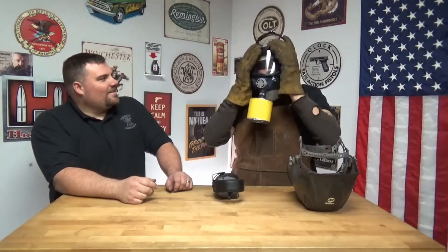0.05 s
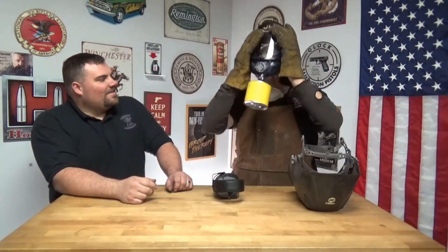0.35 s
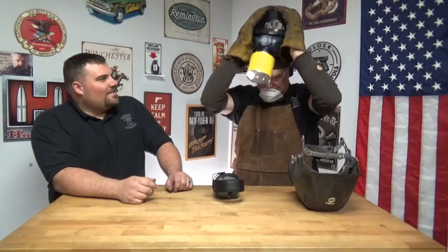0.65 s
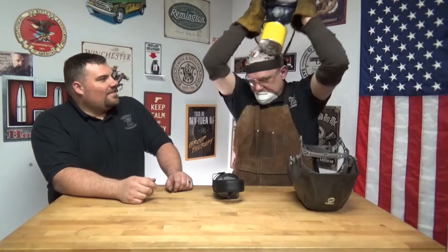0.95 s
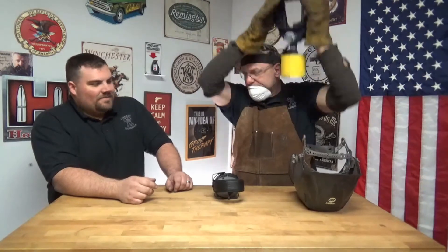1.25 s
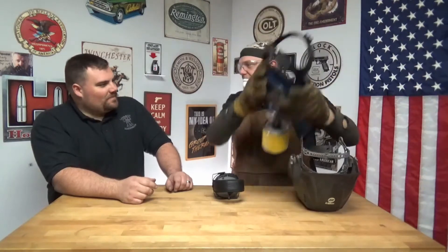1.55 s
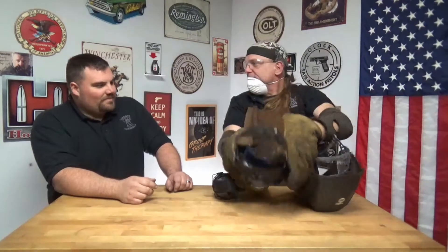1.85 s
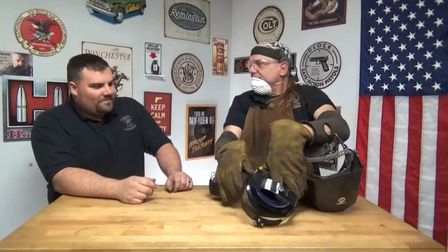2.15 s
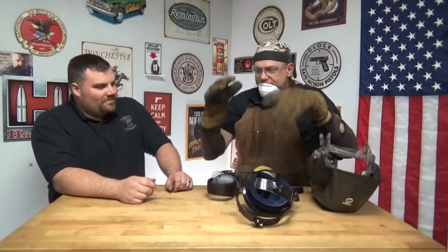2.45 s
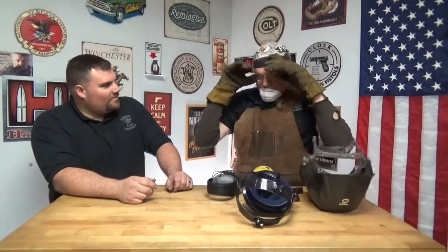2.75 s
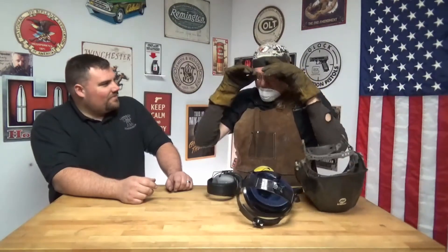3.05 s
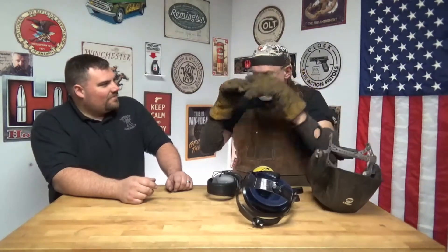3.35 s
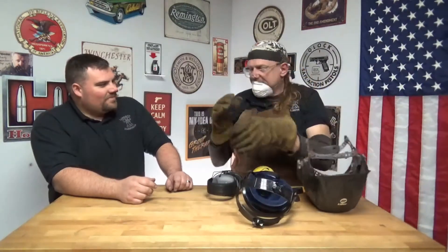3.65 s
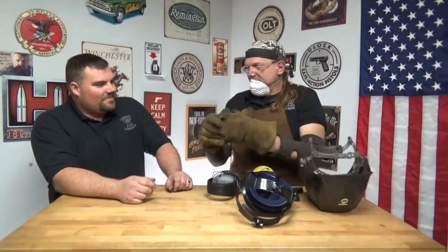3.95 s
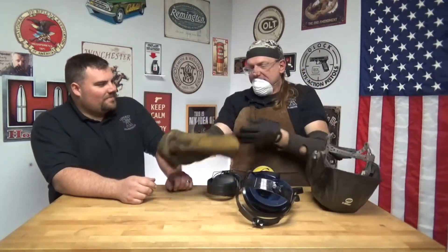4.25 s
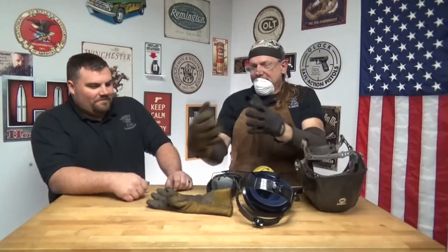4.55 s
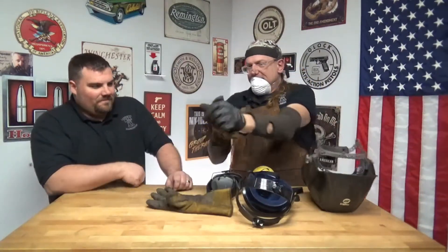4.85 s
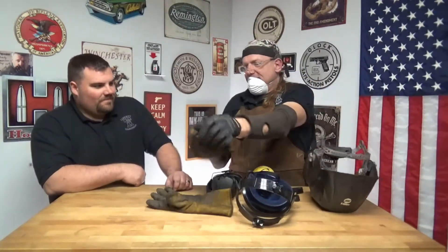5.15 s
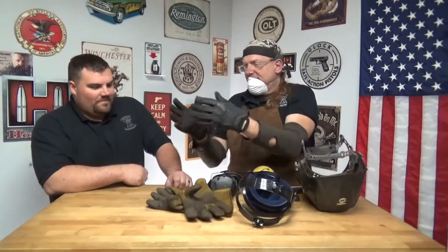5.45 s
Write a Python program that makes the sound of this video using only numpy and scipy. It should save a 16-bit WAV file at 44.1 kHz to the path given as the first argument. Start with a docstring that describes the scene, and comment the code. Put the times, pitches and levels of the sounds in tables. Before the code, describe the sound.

A mask knocks and rocks on a wooden workbench amid soft clothing rustle, followed by two leather gloves tugged off and tossed down.

```python
"""Sleeves and leather gloves rustle as a man pulls off a gas mask in a small workshop.
He drops it on a wooden bench: the top rings, the rubber judders, the mask rocks, its visor clacks
and its buckles click. He tugs off two welding gloves and tosses each on the bench with a slap.
Impacts are bench modes plus bursts of micro-impacts; rustle is stick-slip noise.
Mains and a motor hum quietly over moving air, and something ticks faintly thirty times a second."""
import sys
import numpy as np
from scipy import signal
from scipy.fft import rfft, irfft, next_fast_len
from scipy.io import wavfile
from scipy.ndimage import uniform_filter1d

SR = 44100
rng = np.random.default_rng(int(sys.argv[2]) if len(sys.argv) > 2 else 0)


def file_out(sig):
    """Save sig as 16-bit WAV at sys.argv[1]."""
    # one column per channel
    cols = np.atleast_2d(sig).T
    # limit, then scale
    lim = np.clip(cols, -1, 1)
    pcm = np.round(lim * 32767).astype(np.int16)
    wavfile.write(sys.argv[1], SR, pcm)


N = 251261
N_FFT = next_fast_len(N)
T = np.arange(N) / SR

# mask drops, then rocks twice: start_s, knock_db, boom_db, clack_db, clack_hz, crack_db
MASK_LANDINGS = [(1.8235, -11, -9, -17.5, 980, -26), (1.9692, -15, -24, -21, 610, -29),
                 (2.07, -17, -26, -17.5, 635, -35)]
# hard visor tips onto the wood: start_s, clack_db, clack_hz, crack_db, clack_t60_s
VISOR_CLACKS = [(1.8799, -16.5, 1650, -26.5, 0.061), (2.0938, -21.5, 1600, -28, 0.032),
                (2.1245, -21, 2480, -27.5, 0.074)]
# bench top with the mask on it: mode_hz, relative_db, base_t60_s
BENCH_MODES = [(68, -13.5, 0.4), (147.3, -4.5, 0.16), (171.6, 4.5, 0.13), (225.5, -10, 0.39),
               (290.7, -17, 0.37), (358, -9.5, 0.085), (373.4, -1, 0.055), (424, -4, 0.067),
               (491, -3, 0.12), (563.4, 4, 0.068), (580, -1.5, 0.12), (594.4, -13.5, 0.15),
               (646, -0.5, 0.022), (800, -26, 0.093), (866, 1, 0.023), (939, -7, 0.052), (1070, -18, 0.079),
               (1125, -16, 0.22), (1220, -16.5, 0.069), (1510, -48, 0.27), (1790, -24, 0.053)]
# loose buckle taps the mask: start_s, level_db
BUCKLE_TAPS = [(1.3204, -40), (2.1258, -29), (2.138, -22), (2.163, -28), (2.2308, -25), (2.2745, -34)]
# buckle ring: mode_hz, relative_db, base_t60_s
BUCKLE_MODES = [(2196, 2.5, 0.029), (2270, 2, 0.016), (2920, -6, 0.036), (3220, -3.5, 0.052),
                (3506, 1, .025), (3530, -10, 0.017), (3780, 4, 0.014)]
# gloves land on the bench: start_s, slap_db, slap_hz, slap_t60_s, palm_db, fingers_db
GLOVE_DROPS = [(4.512, -27.5, 1150, 0.061, -25, -33.5), (5.472, -33.5, 1620, 0.02, -30.5, -59)]
# hard parts of straps and cuffs: start_s, level_db, centre_hz
STRAP_CLICKS = [(1.045, -51.5, 6000), (1.757, -49, 2930), (2.2747, -66, 3000), (2.3376, -45.5, 6040),
                (2.7788, -46, 5560), (2.9542, -52.5, 7000), (3.2448, -50.5, 8600), (4.4828, -37.5, 5200),
                (5.377, -51.5, 5600), (5.473, -35, 3800), (5.6095, -45, 4400)]
# padded gear bumps together: start_s, tap_db, thump_db
GEAR_BUMPS = [(1.045, -62, -46), (1.19, -52, -43.5), (1.276, -52.5, -50), (2.336, -50, -42.5),
              (2.466, -47.5, -43.5), (2.736, -55, -64), (3.994, -50, -39.5), (5.379, -50.5, -44),
              (5.6109, -42, -44.5)]
# arm movements: peak_s, half_length_s, hiss_db
SLEEVE_SWISHES = [(0.376, 0.28, -61), (.505, 0.09, -53.5), (0.809, 0.12, -56.5), (1.155, 0.1, -53),
                  (3.374, 0.018, -50), (4.83, 0.047, -53), (5.676, 0.14, -62.5)]
# gloves grip the mask, then are tugged off: peak_s, half_length_s, rub_db
GLOVE_RUBS = [(0.216, 0.73, -59.5), (1.345, 0.089, -55), (1.61, .024, -41.5), (1.706, 0.18, -53),
              (2.834, 0.18, -61.5), (3.289, 0.059, -58), (4.066, 0.05, -59.5), (4.277, 0.05, -46.5),
              (4.954, 0.093, -55.5), (5.131, 0.067, -47.5), (5.303, 0.068, -59)]
# mask and cuffs drag over wood: peak_s, half_length_s, hiss_db, rub_db
DRAGS = [(1.88, 0.057, -34, -38), (2.039, .07, -37, -37.5), (2.122, 0.05, -34, -33.5),
         (2.239, .1, -50, -41.5), (4.49, 0.0085, -54, -39), (4.518, 0.042, -47.5, -43),
         (5.451, .017, -59, -40)]
# cloth hiss: freq_hz, density_db
CLOTH_SPECTRUM = [(1500, -3), (2600, 1), (4200, 2.5), (6500, -3), (9000, -8), (11000, -9.5)]
# leather rub: freq_hz, density_db
LEATHER_SPECTRUM = [(150, 0), (350, 1.5), (600, 6), (1100, 1.5), (1800, 1.5), (2800, -2), (5000, -20)]
# thin sheen of sliding sleeves: freq_hz, density_db
SHEEN_SPECTRUM = [(4000, -33), (7000, -25), (8500, 3), (11000, -4)]
# room decay: freq_hz, t60_s
ROOM_DECAY = [(60, 0.61), (200, 0.32), (600, 0.27), (2000, 0.23), (5000, 0.15), (10000, 0.22)]
# reflections against direct sound: freq_hz, wet_db
ROOM_WET = [(60, -15), (200, -2.5), (600, -3.5), (2000, -4.5), (5000, -5), (10000, -4)]
# left-right likeness of reflections: freq_hz, correlation
ROOM_CORRELATION = [(60, 0.18), (150, 0.8), (300, 0.98), (600, 0.12), (2000, 0.24), (10000, .05)]
# mains and motor lines: pitch_hz, relative_db
HUM_LINES = [(120.0, -53), (111.3, -58), (167.0, -65), (222.6, -69), (333.9, -67.5)]
# moving air: freq_hz, density_db
AIR_SPECTRUM = [(25, -54), (45, -6), (70, -3), (110, 2), (200, 0), (300, -2.5), (400, 4), (550, -5.5),
                (1000, -9.5), (2000, -13), (3000, -14.5), (5000, -18.5), (10500, -23)]
# left-right likeness of the air: freq_hz, correlation
AIR_CORRELATION = [(40, 1), (200, 0.94), (600, 0.87), (3000, 0.22), (10000, 0.78)]


def mask_hits(judder_s=0.0145, jitter_s=0.001213, t60_s=0.076, first_give_db=-4.5):
    """Each landing judders in four fading touches; the rubber gives at the first, softening it."""
    hits = []
    for start_s, knock_db, boom_db, clack_db, clack_hz, crack_db in MASK_LANDINGS:
        for touch in range(4):
            give_db = first_give_db if touch == 0 else 0
            hits.append((start_s, boom_db - 5.5 * touch, knock_db + give_db - 3 * touch,
                         clack_db + give_db - 2.8 * touch, clack_hz, crack_db - 11 * touch, t60_s))
            start_s += judder_s + rng.normal(0, jitter_s)
    return hits


def visor_hits(boom_db=-44, knock_db=-17, rebound_s=0.02, rebound_hz=980, rebound_t60_s=0.15):
    """The visor clacks on the wood and rebounds once, duller."""
    hits = []
    for start_s, clack_db, clack_hz, crack_db, t60_s in VISOR_CLACKS:
        hits.append((start_s, boom_db, knock_db, clack_db, clack_hz, crack_db, t60_s))
        hits.append((start_s + rebound_s, boom_db, knock_db - 4,
                     clack_db - 2, rebound_hz, crack_db - 11, rebound_t60_s))
    return hits


def glove_hits(flop_hz=497, palm_lag_s=0.006, palm_t60_s=0.11, fingers_lag_s=0.037, fingers_t60_s=0.17):
    """A glove slaps, its palm settles, its fingers fall; the bench answers each in proportion."""
    parts = []
    for start_s, slap_db, slap_hz, slap_t60_s, palm_db, fingers_db in GLOVE_DROPS:
        parts += [(start_s, slap_db, slap_hz, slap_t60_s),
                  (start_s + palm_lag_s, palm_db, flop_hz, palm_t60_s),
                  (start_s + fingers_lag_s, fingers_db, flop_hz, fingers_t60_s)]
    return [(start_s, db - 13, db - 4.5, db, hz, db - 22, t60_s) for start_s, db, hz, t60_s in parts]


def landings(hits, clack_width, crack_hz, crack_width, t60_scale):
    """Each hit rings the bench; the object itself gives a clack and a short, bright crack."""
    out = np.zeros(N)
    for start_s, boom_db, knock_db, clack_db, clack_hz, crack_db, t60_s in hits:
        add(out, start_s, bench(boom_db, knock_db, t60_scale))
        add(out, start_s, from_db(clack_db) * contact(clack_hz, clack_width, t60_s, order=2))
        add(out, start_s, from_db(crack_db) * contact(crack_hz, crack_width, 0.35 * t60_s, order=2))
    return out


def bench(boom_db, knock_db, t60_scale, boom_below_hz=200, highpass_hz=56):
    """Weight drives the low modes, hardness the upper ones; little radiates below the lowest."""
    mode_hz, relative_db, base_t60_s = np.transpose(BENCH_MODES)[:, :, None]
    drive_db = np.where(mode_hz < boom_below_hz, boom_db - 1, knock_db + 3)
    top = ringing(mode_hz, relative_db + drive_db, base_t60_s * t60_scale, scatter_db=5.5)
    return signal.sosfilt(signal.butter(4, highpass_hz, "high", fs=SR, output="sos"), top)


def buckle(t60_scale=0.95, tick_db=-11):
    """A small hard part ticks and rings briefly at each tap."""
    out = np.zeros(N)
    mode_hz, relative_db, base_t60_s = np.transpose(BUCKLE_MODES)[:, :, None]
    for start_s, tap_db in BUCKLE_TAPS:
        add(out, start_s, ringing(mode_hz, relative_db + tap_db, base_t60_s * t60_scale, scatter_db=0.5))
        add(out, start_s, from_db(tap_db + tick_db) * contact(2500, width=0.31, t60_s=0.044))
    return out


def ringing(mode_hz, level_db, t60_s, scatter_db):
    """Struck modes alternate in sign; each contact point favours different ones."""
    t = T[:SR // 3]
    gain = from_db(level_db + scatter_db * rng.standard_normal(mode_hz.shape))
    sign = (-1) ** np.arange(len(mode_hz))[:, None]
    decay = from_db(-60 * t / t60_s)
    return np.sum(sign * gain * decay * np.sin(2 * np.pi * mode_hz * t), axis=0)


def contact(centre_hz, width, t60_s, order=1):
    """Dying micro-impacts through one broad resonance; energy of 10 ms at rms 1."""
    t = T[:SR // 4]
    flurry = slips(len(t), rate_per_s=14000, spread_db=1.96) * from_db(-60 * t / t60_s)
    edges_hz = np.clip([centre_hz / (1 + width), centre_hz * (1 + width)], 20, SR / 2 - 100)
    burst = signal.sosfilt(signal.butter(order, edges_hz, "band", fs=SR, output="sos"), flurry + 1e-18)
    return burst * np.sqrt(0.01 * SR / np.sum(burst ** 2))


def gear():
    """Hard strap parts click; padded gear bumps with a soft tap and a dull thump."""
    out = np.zeros(N)
    for start_s, level_db, centre_hz in STRAP_CLICKS:
        add(out, start_s, from_db(level_db) * contact(centre_hz, width=0.36, t60_s=0.015))
    for start_s, tap_db, thump_db in GEAR_BUMPS:
        add(out, start_s, from_db(tap_db) * contact(1800, width=0.48, t60_s=0.12))
        add(out, start_s, from_db(thump_db) * contact(300, width=1.0, t60_s=0.15, order=2))
    return out


def rustle(sleeve_rub_db=-11, glove_hiss_db=-1, sheen_db=-7.5):
    """Cloth hisses in fine grains, sleeves with a thin sheen; leather rubs coarser and lower."""
    smooth_slide = (4.68, 0.3, -64)   # sleeve with extra sheen: peak_s, half_length_s, level_db
    sleeves = [(s, half_s, db, db + sleeve_rub_db) for s, half_s, db in SLEEVE_SWISHES + [smooth_slide]]
    gloves = [(s, half_s, db + glove_hiss_db, db) for s, half_s, db in GLOVE_RUBS]
    peak_s, half_s, hiss_db, rub_db = np.transpose(sleeves + gloves + DRAGS)
    hiss_gain = from_db(1.5) * movement(zip(peak_s, half_s, hiss_db))
    rub_gain = from_db(2.5) * movement(zip(peak_s, half_s, rub_db))
    sheen_gain = from_db(sheen_db) * movement(SLEEVE_SWISHES) + stroke(*smooth_slide)
    cloth = coloured(slips(N, rate_per_s=9000, spread_db=0.91), CLOTH_SPECTRUM)
    leather = coloured(slips(N, rate_per_s=2500, spread_db=0.28), LEATHER_SPECTRUM)
    sheen = coloured(rng.standard_normal(N), SHEEN_SPECTRUM)
    return hiss_gain * cloth + rub_gain * leather + sheen_gain * sheen


def movement(strokes, fidget_db=-73.5):
    """Strokes add in power over a floor: clothing is never quite still."""
    return np.sqrt(from_db(fidget_db) ** 2 + sum(stroke(*row) ** 2 for row in strokes))


def stroke(peak_s, half_length_s, level_db, roundness=1.36):
    """Symmetric speed-up and slow-down; roundness 1 is pointed, 2 a bell."""
    return from_db(level_db) * np.exp(-np.abs((T - peak_s) / half_length_s) ** roundness)


def slips(size, rate_per_s, spread_db):
    """Tiny stick-slip clicks of uneven strength; rms 1."""
    strength = from_db(spread_db * np.minimum(rng.exponential(1, size), 4))
    slipping = rng.random(size) < rate_per_s / SR
    return unit_rms(slipping * strength * rng.standard_normal(size))


def workshop(direct, first_wall_s=0.0024):
    """Direct sound plus dense reflections from near walls; the bass lasts longest."""
    t = T[:SR * 2 // 3]
    spectrum = rfft(stereo_noise(ROOM_CORRELATION, len(t)))
    bin_hz = np.arange(spectrum.shape[1]) * SR / len(t)
    edges_hz = np.geomspace(45, 12000, 20)
    onset = 1 - np.exp(-(t / first_wall_s) ** 2)
    response = np.zeros((2, len(t)))
    for low_hz, high_hz in zip(edges_hz, edges_hz[1:]):
        centre_hz = np.sqrt(low_hz * high_hz)
        band = irfft(spectrum * (bin_hz >= low_hz) * (bin_hz < high_hz), len(t))
        band *= onset * from_db(-60 * t / at_hz(ROOM_DECAY, centre_hz))
        band /= np.linalg.norm(band, axis=1, keepdims=True)   # diffuse: equal on both sides
        response += band * from_db(at_hz(ROOM_WET, centre_hz)) * np.sqrt(2 * (high_hz - low_hz) / SR)
    return direct + signal.fftconvolve(direct[None], response, axes=1)[:, :N]


def ticking(rate_hz=29.97, first_s=0.009, pitch_hz=2660, level_db=-53, swell_s=0.004, fall_hz_per_s=8000):
    """Faint, even ticks; each swells, sinks a little in pitch and dies."""
    age_s = (T - first_s) % (1 / rate_hz)
    swell = (age_s / swell_s * np.exp(1 - age_s / swell_s)) ** 2
    cycles = (pitch_hz - fall_hz_per_s * age_s / 2) * age_s
    return from_db(level_db) * swell * np.sin(2 * np.pi * cycles)


def hum(gain_db=-3, in_phase_s=0.099):
    """A motor's second order beats against the mains hum."""
    lines = sum(from_db(db) * np.cos(2 * np.pi * hz * (T - in_phase_s)) for hz, db in HUM_LINES)
    return from_db(gain_db) * np.sqrt(2) * lines


def air(level_db=-56):
    """Moving air: steady, bass-heavy noise."""
    return from_db(level_db) * coloured(stereo_noise(AIR_CORRELATION, N_FFT), AIR_SPECTRUM)


def stereo_noise(correlation, size):
    """White noise with frequency-dependent left-right correlation."""
    mid, side = rfft(rng.standard_normal((2, size)))
    alike = np.clip(at_hz(correlation, np.arange(len(mid)) * SR / size), 0, 0.99)
    left_right = np.sqrt(1 + alike) * mid + np.sqrt(1 - alike) * side * [[1], [-1]]
    return irfft(left_right, size) / np.sqrt(2)


def coloured(noise, spectrum):
    """Noise shaped to a spectrum; rms 1."""
    bin_hz = np.arange(N_FFT // 2 + 1) * SR / N_FFT
    shaped = rfft(noise, N_FFT) * from_db(at_hz(spectrum, bin_hz))
    return unit_rms(irfft(shaped, N_FFT)[..., :N])


def at_hz(table, hz):
    """Table lookup on a log-frequency axis."""
    freq_hz, values = np.transpose(table)
    return np.interp(np.log(np.maximum(hz, 1)), np.log(freq_hz), values)


def from_db(db):
    """Decibels to gain."""
    return 10 ** (np.asarray(db) / 20)


def unit_rms(x):
    """Scale to rms 1."""
    return x / np.sqrt(np.mean(x ** 2) + 1e-20)


def add(out, start_s, sound):
    """Mix a sound in at start_s."""
    at = round(start_s * SR)
    out[at:at + len(sound)] += sound[:N - at]


def scene():
    """Mask slightly right; gloves and handling slightly left; hum, air and ticking behind."""
    hits = mask_hits() + visor_hits()
    mask = landings(hits, clack_width=0.5, crack_hz=6000, crack_width=1.0, t60_scale=0.66) + buckle()
    gloves = landings(glove_hits(), clack_width=0.42, crack_hz=5740, crack_width=0.73, t60_scale=0.57)
    handling = gloves + gear() + rustle()
    action = workshop(mask) * from_db([[-0.3], [0.3]]) + workshop(handling) * from_db([[0.2], [-0.2]])
    return action + hum() + air() + ticking()


def record(dry, threshold_db=-3, release_db_per_s=120, cutoff_hz=10520):
    """Limiter on the loudest knocks, then a steep low-pass."""
    peak_db = 20 * np.log10(np.abs(dry).max(axis=0) + 1e-9)
    over_db = np.maximum(peak_db - threshold_db, 0)
    reduction_db = np.maximum.accumulate(over_db + release_db_per_s * T) - release_db_per_s * T
    limited = dry * from_db(-uniform_filter1d(reduction_db, size=45))
    return signal.sosfilt(signal.ellip(12, 0.2, 70, cutoff_hz, fs=SR, output="sos"), limited)


dry = scene()
out = record(dry)
file_out(out)
```